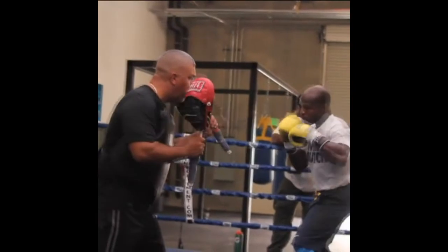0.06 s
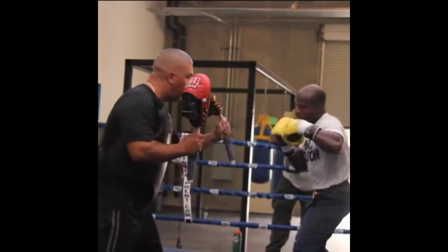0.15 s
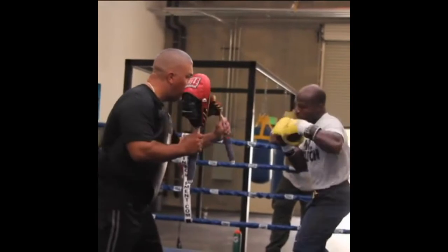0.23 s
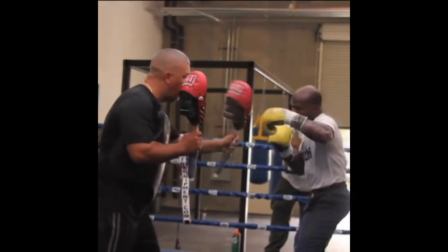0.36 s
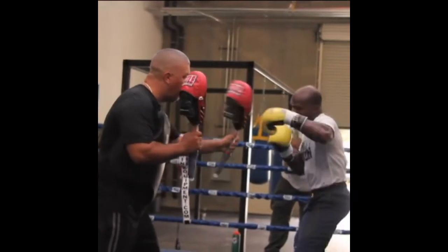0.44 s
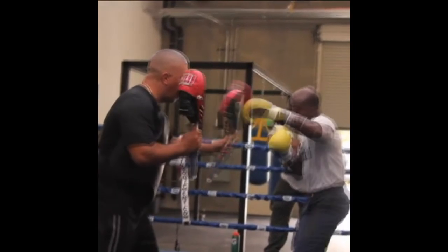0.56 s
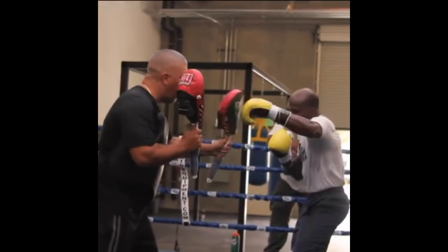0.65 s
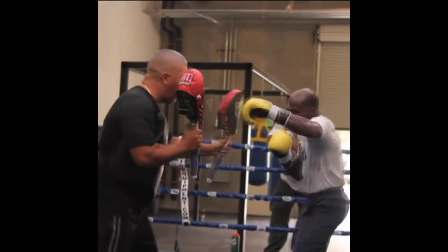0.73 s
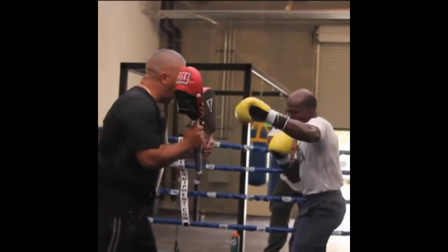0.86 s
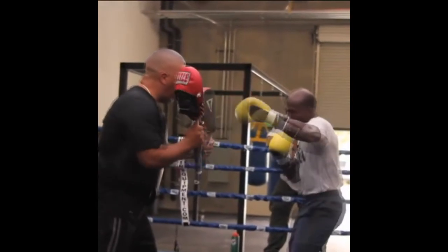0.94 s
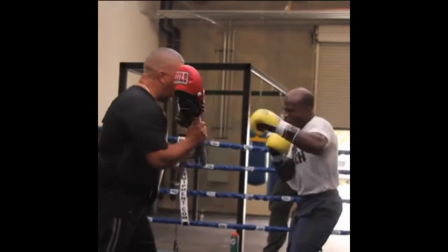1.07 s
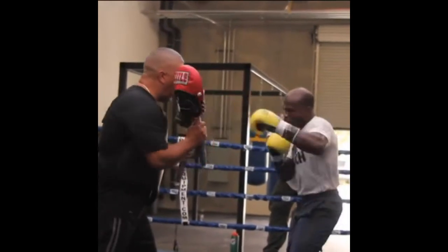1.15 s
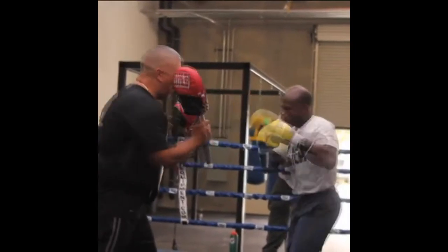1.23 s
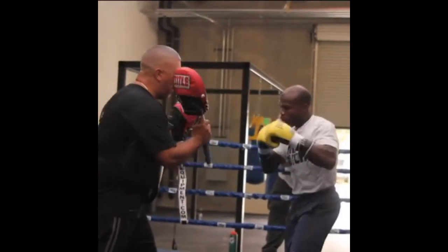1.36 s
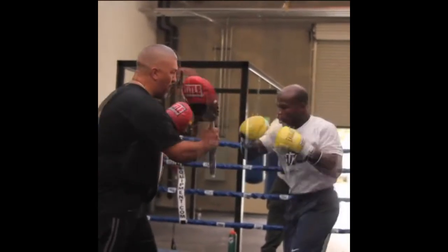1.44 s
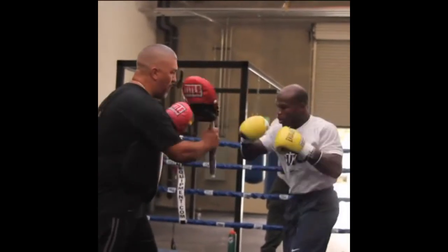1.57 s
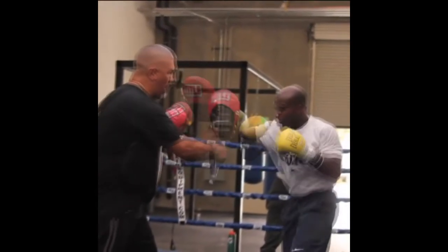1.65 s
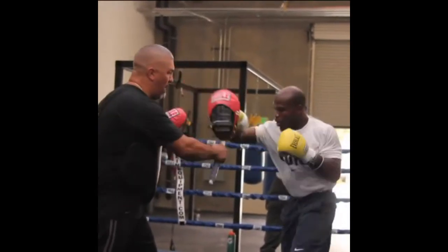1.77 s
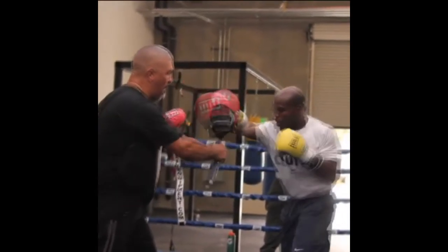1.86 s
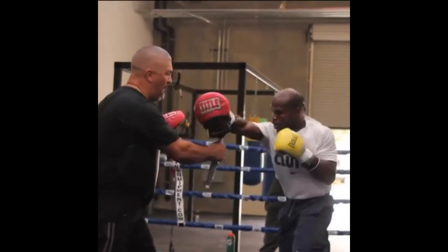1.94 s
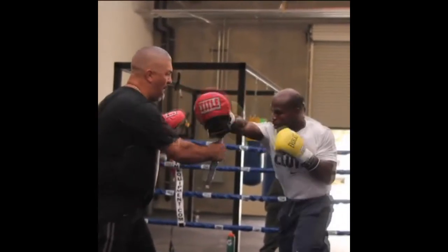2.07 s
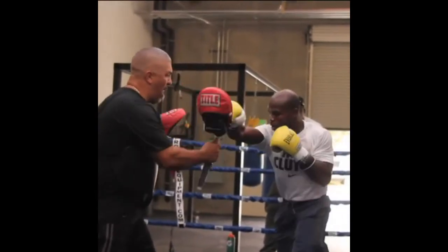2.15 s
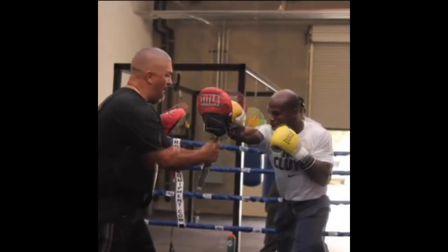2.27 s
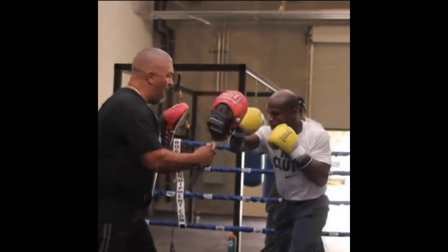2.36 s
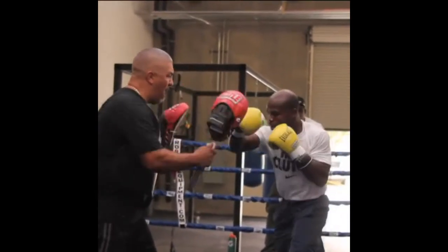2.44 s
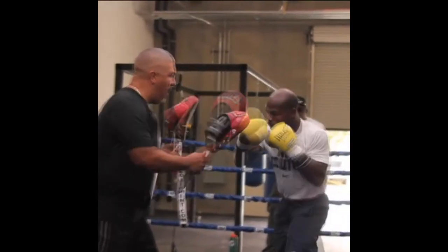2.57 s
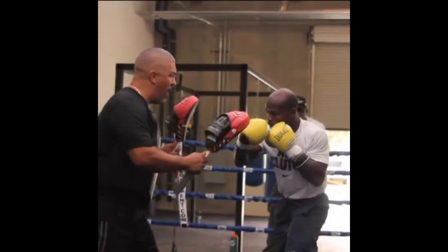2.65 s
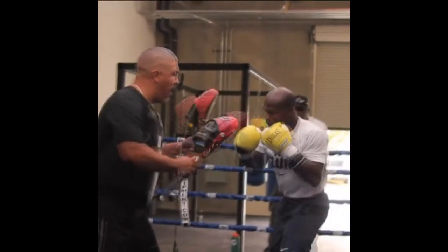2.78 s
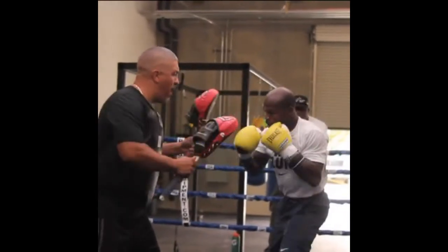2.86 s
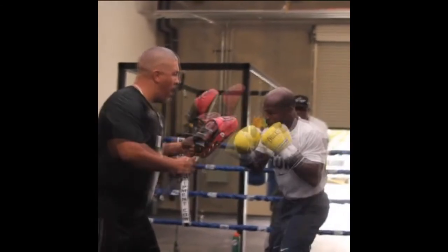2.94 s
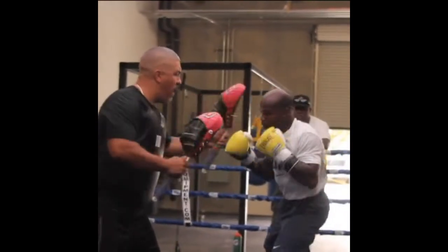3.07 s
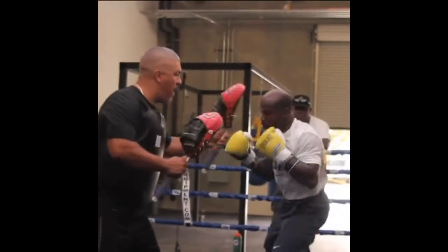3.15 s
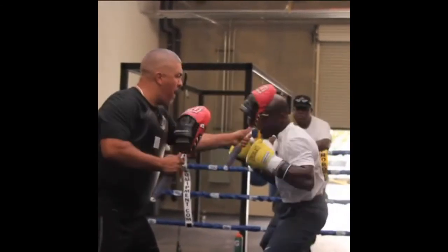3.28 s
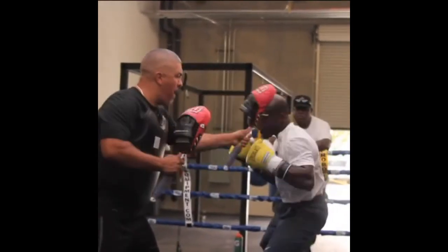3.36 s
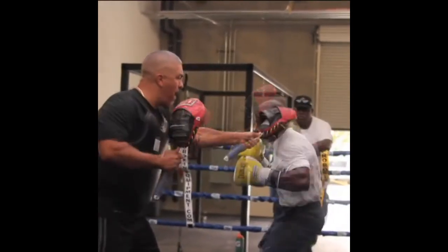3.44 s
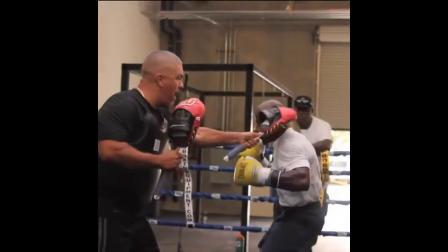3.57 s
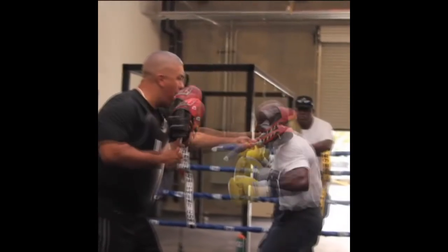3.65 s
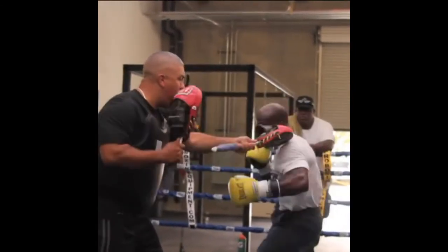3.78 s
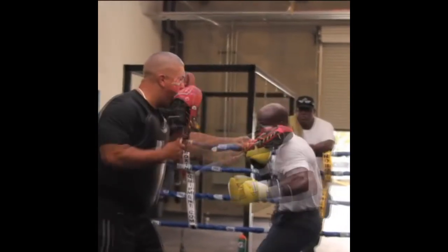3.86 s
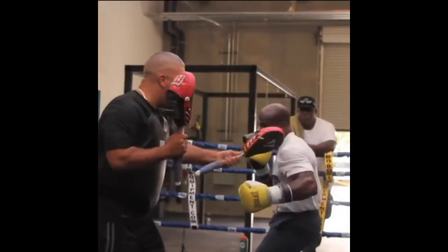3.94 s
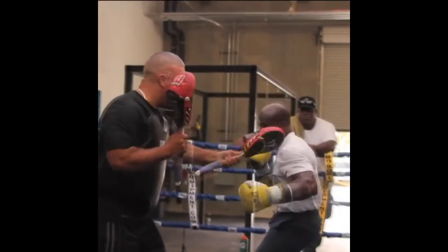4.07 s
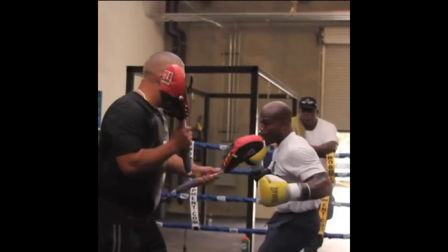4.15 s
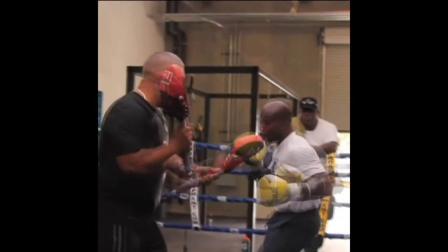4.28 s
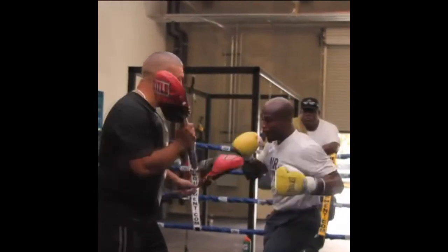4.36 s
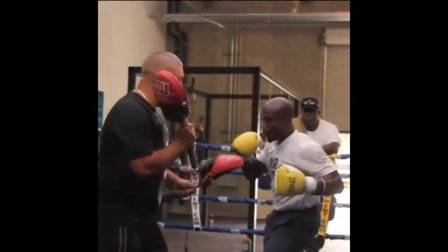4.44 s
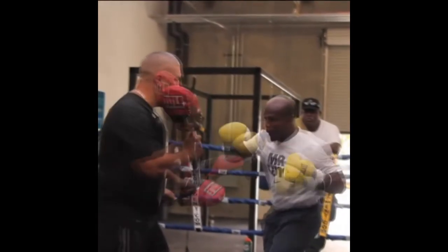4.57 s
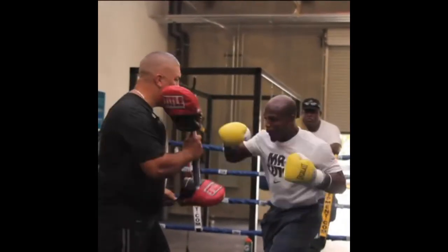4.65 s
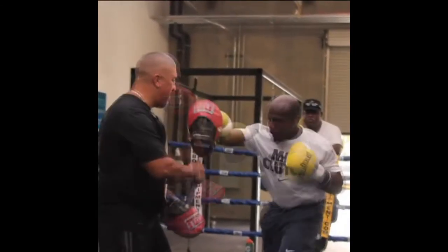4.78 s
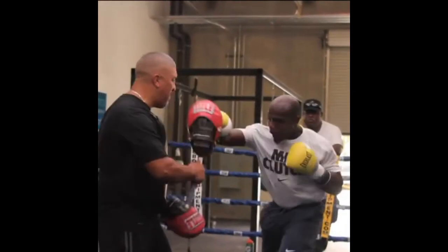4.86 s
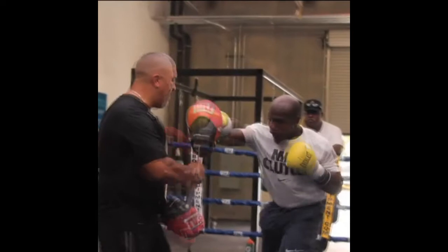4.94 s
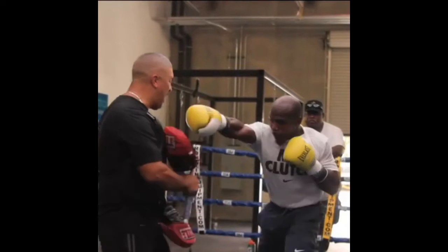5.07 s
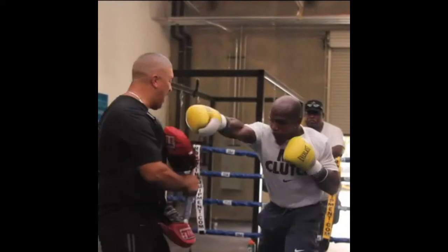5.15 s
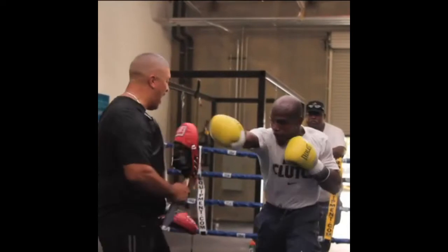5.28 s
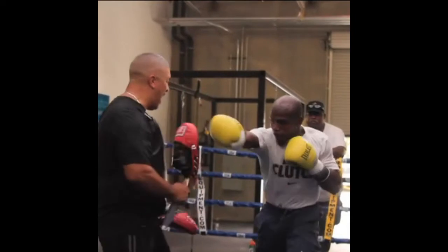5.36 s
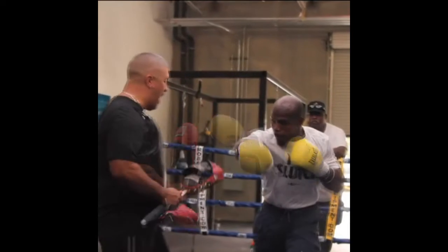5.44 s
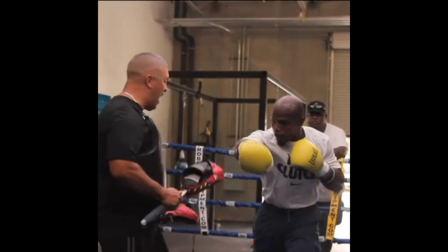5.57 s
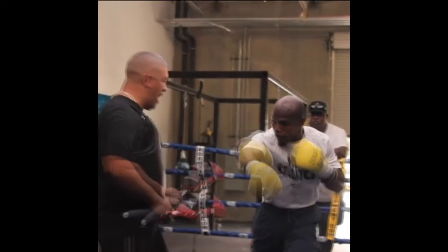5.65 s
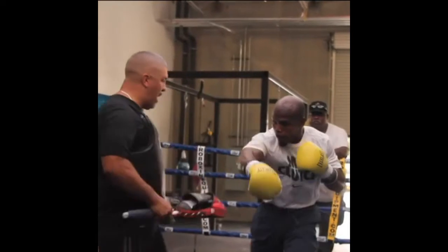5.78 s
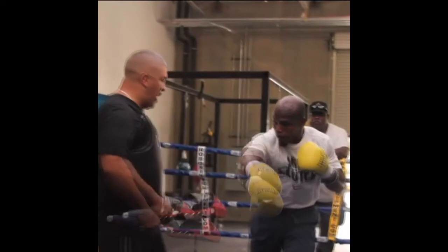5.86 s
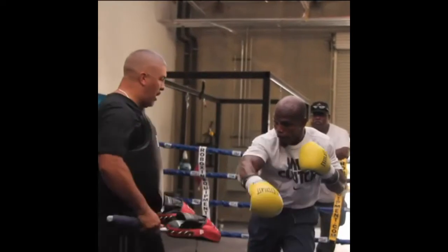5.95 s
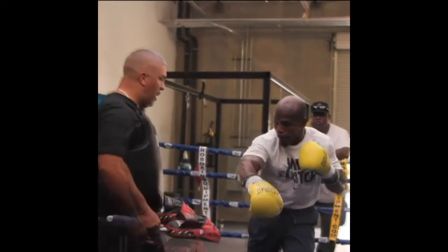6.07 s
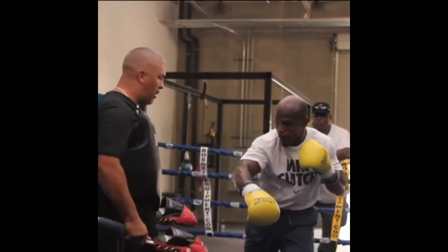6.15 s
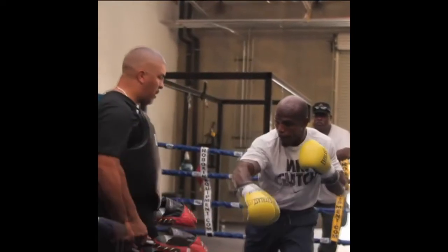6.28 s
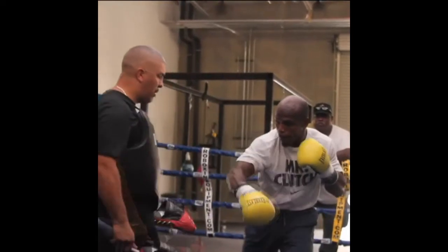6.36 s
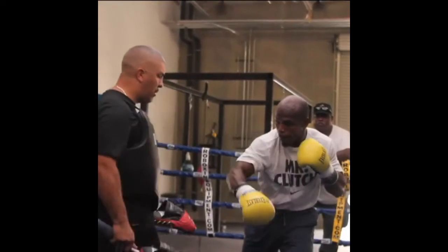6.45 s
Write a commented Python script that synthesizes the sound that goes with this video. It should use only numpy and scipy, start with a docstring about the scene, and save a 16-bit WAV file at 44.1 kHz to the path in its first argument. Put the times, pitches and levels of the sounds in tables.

```python
"""Three slow-motion boxing punches land on padded mitts in a large gym, deep and drawn out.
A light footfall (a sagging sine thud) and soft swells of coloured noise open over a steady noise rumble.
Each punch is a double sine thud with noise-burst smacks that overload; a falling flutter leads the second.
After each punch the hall, shaped noise decaying by frequency, roars on for seconds and darkens,
held level by the recorder's gain control, while feet thump and soft noise swells come and go."""
import sys
import numpy as np
from scipy import signal
from scipy.fft import rfft, irfft, next_fast_len
from scipy.io import wavfile
from scipy.ndimage import uniform_filter1d

SR = 44100
rng = np.random.default_rng(int(sys.argv[2]) if len(sys.argv) > 2 else 0)


def transcribe(u):
    """Save the signal u as a 16-bit wav file named by the first command-line argument.

    u: samples, shape (n,) or (channels, n), limited to [-1, 1]; the rate is SR.
    q: integer samples, one column per channel.
    """
    v = np.clip(np.atleast_2d(u).T, -1, 1)
    q = np.round(v * 32767).astype(np.int16)
    wavfile.write(sys.argv[1], SR, q)


N = 287253
TIME = np.arange(N) / SR
DULL_LIMIT_HZ = 3350  # upper limit of everything but the bright snaps and the flutter

# Two blows a punch, glove on mitt and padding bottoming out: start_s, thud_db, thud_hz, thud_t60_s,
# smack_db, smack_delay_s, smack_t60_s, snap_db
IMPACTS = [(0.8060, 12, 38.1, 0.13, 3.5, 0.0019, 0.071, -23.5),
           (0.8211, -2, 39.3, 0.25, -3.5, 0.0013, 0.3, -34.5),
           (2.102, 18, 51.7, 0.041, 2.5, 0.00184, .045, 8),
           (2.1138, 11.5, 38.6, 0.14, 5.5, 0.0046, 0.078, -36.5),
           (5.2118, 15.5, 71, 0.032, 9, 0.00044, 0.027, -19),
           (5.2197, 2.5, 57, 0.12, 7, 0.00089, 0.13, -16)]


def gain_of(db):
    """Level law: 20 dB is a tenfold amplitude."""
    return 10 ** (np.asarray(db) / 20)


def evened(x):
    """Normalisation to unit rms."""
    return x / np.sqrt(np.mean(x ** 2) + 1e-20)


def read(points, hz):
    """Interpolation of a spectral curve along a logarithmic frequency axis."""
    point_hz, value = np.transpose(points)
    return np.interp(np.log(hz + 1), np.log(point_hz + 1), value)


def add(mix, start_s, sound):
    """Superposition: pressures add from the start time on."""
    part = mix[:, round(start_s * SR):][:, :sound.shape[-1]]
    part += sound[..., :part.shape[1]]


def low_pass(x, hz):
    """Linear-phase band limiting with a windowed-sinc filter."""
    taps = signal.firwin(401, hz, window=("kaiser", 8), fs=SR)
    return signal.oaconvolve(x, taps[None], "same")


def stereo_spectra(hz, shape):
    """Partial coherence: sum and difference of independent spectra set the left-right likeness."""
    # Left-right likeness of the sound field: frequency_hz, correlation
    likeness = [(30, 0.61), (80, 0.67), (160, 0.77), (600, 0.89), (1300, 0.6), (3000, 0.22)]
    a, b, c, d = rng.standard_normal((4,) + shape)
    same = np.clip(read(likeness, hz), -1, 1)
    mid = np.sqrt(1 + same) * (a + 1j * b)
    side = np.sqrt(1 - same) * (c + 1j * d)
    return np.array([mid + side, mid - side])


def noise(colour_db, size):
    """Spectral shaping: random spectra under a level curve of frequency give stereo noise of rms 1."""
    hz = np.fft.rfftfreq(size, 1 / SR)
    return evened(irfft(stereo_spectra(hz, hz.shape) * gain_of(colour_db(hz)), size))


def burst(spectrum, t60_s, rise_s=0.0001, width=0.18):
    """Impulsive radiation: coloured noise rises at once and decays exponentially, nearly central."""
    t = TIME[:8192]
    pair = noise(lambda hz: read(spectrum, hz), size=len(t))
    middle = pair.mean(0)
    narrow = middle + width * (pair - middle)
    return narrow * (1 - np.exp(-t / rise_s)) * gain_of(-60 * t / t60_s)


def thud(hz, t60_s, stiff_turns, relax_s, squash_s=0.003):
    """Stiffening spring: a struck cushion starts stiff and high, and its pitch sags as it gives way."""
    t = TIME[:SR // 2]
    turns = hz * t + stiff_turns * (1 - np.exp(-t / relax_s))
    onset = 1 - np.exp(-t / squash_s)
    return -np.sin(2 * np.pi * turns) * onset * gain_of(-60 * t / t60_s)


def punches(slap_t60_s=0.021, snap_t60_s=0.013):
    """Impact: the padding resonates as a dull thud, the leather smacks dully, and only the snap is bright."""
    # Light leather slaps and their returns from the walls: start_s, level_db
    slaps = [(0.776, -24.5), (0.839, 0), (0.8642, -6), (0.94, -9), (2.1356, -4), (5.254, -10.5)]
    # Spectrum of leather smacks and slaps: frequency_hz, relative_level_db
    smack_spectrum = [(30, -20), (150, -1.5), (260, 6), (400, 7), (480, -6), (660, 6.5), (950, -8.5),
                      (1350, 2), (1800, -9.5), (2500, -16.5), (3200, -25.5), (3800, -61)]
    # Spectrum of the bright snap: frequency_hz, relative_level_db
    snap_spectrum = [(1000, -22.5), (3000, 9), (6000, -6), (9000, -6), (13000, -9.5), (16000, -8.5),
                     (19000, -28)]
    dull, bright = np.zeros((2, 2, N))
    for start_s, thud_db, hz, t60_s, smack_db, delay_s, smack_t60_s, snap_db in IMPACTS:
        add(dull, start_s, gain_of(thud_db) * thud(hz, t60_s, stiff_turns=0.41, relax_s=0.0022))
        add(dull, start_s + delay_s, gain_of(smack_db) * burst(smack_spectrum, smack_t60_s))
        add(bright, start_s + delay_s, gain_of(snap_db) * burst(snap_spectrum, snap_t60_s))
    for start_s, db in slaps:
        add(dull, start_s, gain_of(db) * burst(smack_spectrum, slap_t60_s))
    return low_pass(dull, DULL_LIMIT_HZ) + bright


def whoosh(peak_s=2.082, peak_db=-7.5, peak_hz=100.1):
    """Frequency glide: a low flutter of air swells until just before the hardest punch, sinking in pitch."""
    rise_db_per_s, fall_db_per_s, sag_octaves_per_s = 230, 400, 7
    t = np.clip(TIME - peak_s, -.5, .5)
    level_db = peak_db + np.minimum(rise_db_per_s * t, -fall_db_per_s * t)
    hz = peak_hz * 2 ** (-sag_octaves_per_s * t)
    turns = -hz / (sag_octaves_per_s * np.log(2))  # the time integral of hz
    return gain_of(level_db) * np.sin(2 * np.pi * turns)


def hall(patchy_db=1.0, build_s=0.025):
    """Reverberation: each punch refills the hall, and the treble dies first and leaves a dark roar."""
    # How hard each of the three punches drives the hall: level_db
    drive_db = [-12, -9.5, -8]
    # Spectrum of the hall's roar: frequency_hz, relative_level_db
    hall_spectrum = [(10, -23.5), (22, 11), (50, 2), (100, -0.5), (160, -2), (280, -6), (450, -4),
                     (700, -2.5), (950, -9.5), (1350, -5), (1700, -9.5), (2100, -19.5), (2800, -26),
                     (3500, -50)]
    # Reverberation time of the hall: frequency_hz, t60_s
    hall_t60 = [(30, 7.2), (200, 11), (650, 8.62), (1000, 6.93), (1400, 5.17), (2000, 3.48), (2700, 1.9),
                (3400, 0.71)]
    # First dense reflections from floor and near walls, relative to the roar
    early_db, early_t60_s = 2.5, 0.34
    # The far wall throws each punch back as one smeared swell
    echo_delay_s, echo_spread_s, echo_db, echo_hz, echo_octaves = 0.18, .05, -2.5, 1600, 1.2
    frame_s = np.arange(N // 256 + 5) * 256 / SR
    bin_hz = np.fft.rfftfreq(1024, 1 / SR)

    octaves_off = np.log2((bin_hz + 1) / echo_hz)
    echo_colour = gain_of(echo_db) * np.exp(-.5 * (octaves_off / echo_octaves) ** 2)
    power = 0
    for impact, db in zip(IMPACTS[::2], drive_db):  # the first blow of each punch
        age_s = np.maximum(frame_s - impact[0], 0)[:, None]
        roar = gain_of(-60 * age_s / read(hall_t60, bin_hz))
        echo = echo_colour * np.exp(-.5 * ((age_s - echo_delay_s) / echo_spread_s) ** 2)
        early = gain_of(early_db - 60 * age_s / early_t60_s)
        drive = gain_of(db) * (1 - np.exp(-age_s / build_s))
        power = power + drive ** 2 * (early ** 2 + echo ** 2 + roar ** 2)
    # Clusters of reflections arrive in patches of time and frequency
    patches = uniform_filter1d(rng.standard_normal(power.shape), size=4, axis=0)
    patches = evened(uniform_filter1d(patches, size=16, axis=1))
    colour = gain_of(read(hall_spectrum, bin_hz) + patchy_db * patches)
    field = stereo_spectra(bin_hz, power.shape) * colour
    frames = np.array([field, field * np.sqrt(power)]).swapaxes(2, 3)
    steady, dying = signal.istft(frames, nperseg=1024, noverlap=768)[1][..., :N]
    return dying / steady.std()  # levels relative to an undamped field


def footfalls():
    """Impact: feet boom on the sprung floor of the ring, each a thud of sagging pitch."""
    # Footfalls on the sprung ring floor: start_s, level_db, pitch_hz, t60_s
    steps = [(0.028, -28, 109, 0.16), (0.877, -6, 15, .35), (1.278, -9, 56, 0.13), (2.387, -10, 80, 0.16),
             (2.578, -6, 23, 0.34), (3.699, -12, 60, 0.41), (3.958, -15, 72, 0.22),
             (4.968, -29.5, 66, 0.22), (5.689, -9, 65, 0.3)]
    out = np.zeros((2, N))
    for start_s, db, hz, t60_s in steps:
        add(out, start_s, gain_of(db) * thud(hz, t60_s, stiff_turns=0.62, relax_s=0.031))
    return out


def soft_swells():
    """Band-limited noise under a Gaussian envelope: soft noise swells come and go."""
    # Soft swells of coloured noise, some of them scuffs, others the hall swelling,
    # Gaussian in time and in octaves: middle_s, level_db, spread_s, centre_hz, width_octaves
    swells = [(0.34, -43, 0.026, 1330, 0.24), (0.651, -39.5, 0.083, 409, 0.17),
              (2.04, -26, 0.039, 150, 0.72), (2.2, -9.5, 0.055, 231.5, 0.86),
              (2.406, -13.5, 0.046, 243, 0.47), (3.01, -50, .02, 2600, 0.086), (3.1, -22, 0.21, 580, 0.51),
              (3.778, -31, 0.13, 64.7, 0.23), (3.92, -24.5, 0.17, 178.3, 0.41),
              (3.839, -50, 0.036, 2140, 0.34), (4.009, -29, 0.051, 1334, 0.33),
              (4.153, -33, 0.13, 650, 0.83), (5.08, -43.5, 0.14, 1510, 0.34)]
    out = np.zeros((2, N))
    size = 2 ** 15
    for middle_s, db, spread_s, centre_hz, octaves in swells:
        band = noise(lambda hz: -4.3 * (np.log2((hz + 1) / centre_hz) / octaves) ** 2, size=size)
        start_s = max(middle_s - size / 2 / SR, 0)
        envelope = np.exp(-.5 * ((TIME[:size] + start_s - middle_s) / spread_s) ** 2)
        add(out, start_s, gain_of(db) * band * envelope)
    return out


def background(level_db=-27.5):
    """Stationary noise: ventilation rumble and hiss of constant power."""
    # Spectrum of the ventilation: frequency_hz, relative_level_db
    rumble_spectrum = [(10, -4), (22, 0.5), (35, -15.5), (55, -20.5), (170, -23), (320, -27.5), (650, -31),
                       (1000, -38), (1350, -34.5), (1800, -42.5), (2300, -46), (2750, -46.5), (3200, -50),
                       (3550, -71.5)]
    return gain_of(level_db) * noise(lambda hz: read(rumble_spectrum, hz), size=N)


def lagged(x, seconds):
    """First-order relaxation: follows x with a smoothing delay."""
    keep = np.exp(-1 / (seconds * SR))
    return signal.lfilter([1 - keep], [1, -keep], x)


def gain_control(x):
    """Level feedforward: deaf to bass and late for the smack, it ducks what follows and recovers slowly."""
    sense_above_hz, sense_s = 300, .04
    duck_above_db, duck_share, duck_lag_s, recover_db_per_s = -17.5, 0.76, 0.031, 5.5
    bass_cut = signal.butter(2, sense_above_hz, "high", fs=SR, output="sos")
    sensed = signal.sosfilt(bass_cut, x.mean(0))
    sensed_db = 10 * np.log10(lagged(sensed ** 2, sense_s) + 1e-12)
    over_db = np.maximum(sensed_db - duck_above_db, 0)
    # The running maximum on a rising ramp lets the ducking fall no faster than the recovery
    recovery_db = recover_db_per_s * TIME
    duck_db = np.maximum.accumulate(duck_share * over_db + recovery_db) - recovery_db
    return x * gain_of(-lagged(duck_db, duck_lag_s))


def scene():
    """Superposition of punches, air, hall, feet, swells and ventilation, slightly louder on the right."""
    room = low_pass(hall() + footfalls() + soft_swells() + background(), DULL_LIMIT_HZ)
    return (punches() + whoosh() + room) * gain_of([[-.3], [.3]])


def record(dry, hiss_db=-87):
    """Saturation: gain control, overload with a firm knee and faint hiss; then treble colour and band limit."""
    # Treble response of the recorder: frequency_hz, gain_db
    treble = [(2500, 0), (3200, 0), (4000, -3.5), (6000, 0.5), (10000, -1), (16000, -4)]
    held = gain_control(dry)
    clipped = held / (1 + held ** 6) ** (1 / 6)
    hissing = clipped + gain_of(hiss_db) * rng.standard_normal(N)
    size = next_fast_len(N)
    hz = np.fft.rfftfreq(size, 1 / SR)
    coloured = irfft(rfft(hissing, size) * gain_of(read(treble, hz)), size)[:, :N]
    return low_pass(coloured, 16000)


dry = scene()
out = record(dry)
transcribe(out)
```